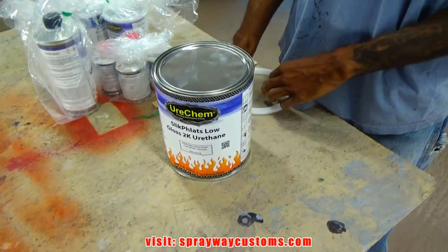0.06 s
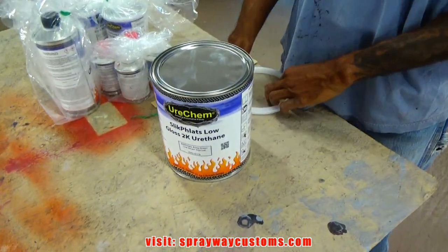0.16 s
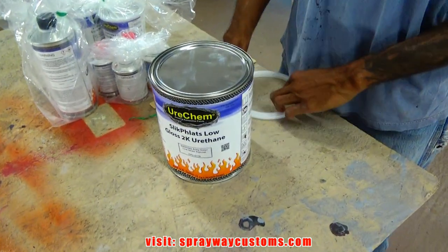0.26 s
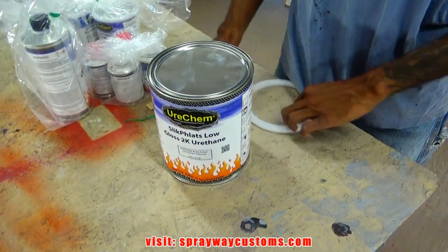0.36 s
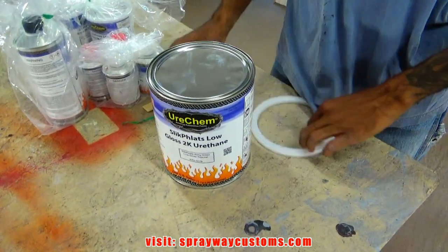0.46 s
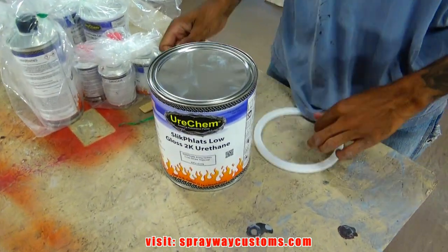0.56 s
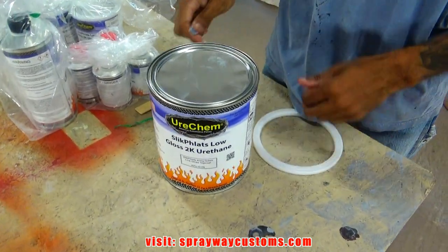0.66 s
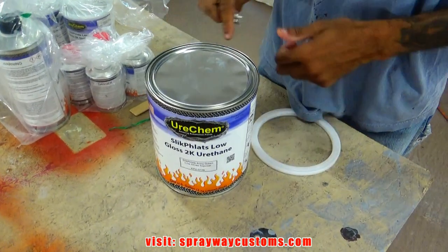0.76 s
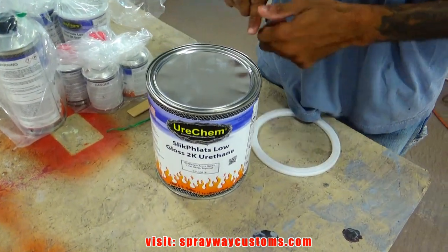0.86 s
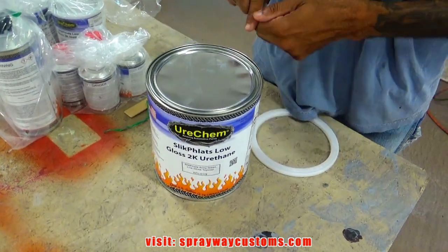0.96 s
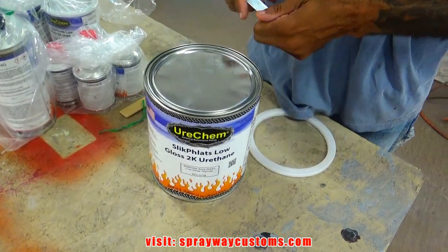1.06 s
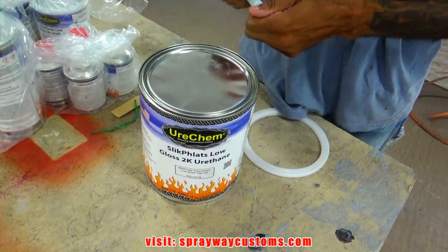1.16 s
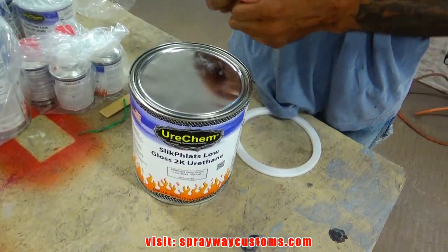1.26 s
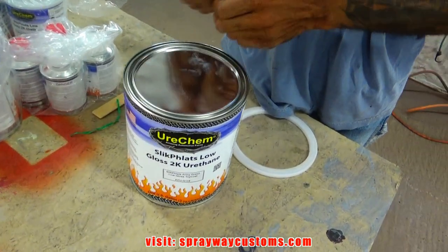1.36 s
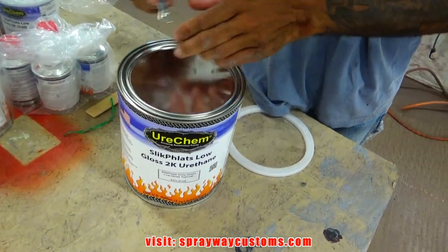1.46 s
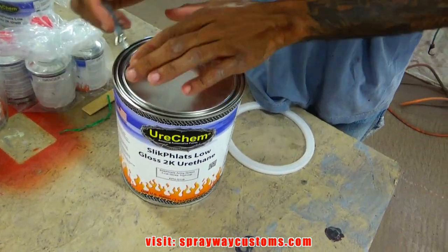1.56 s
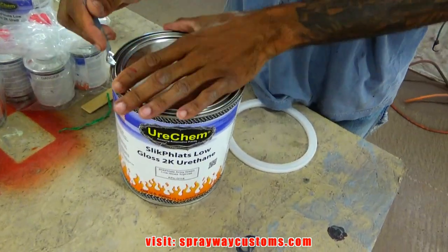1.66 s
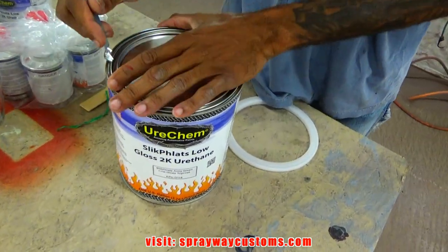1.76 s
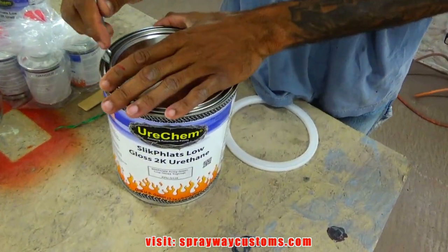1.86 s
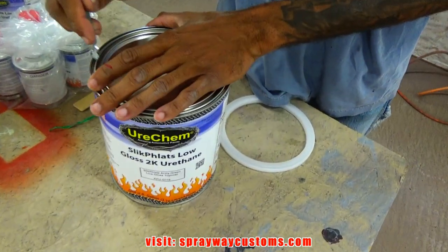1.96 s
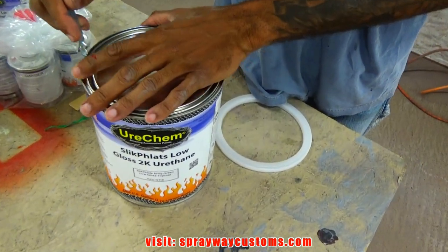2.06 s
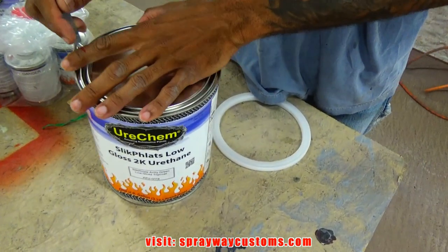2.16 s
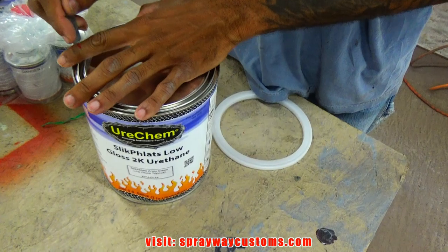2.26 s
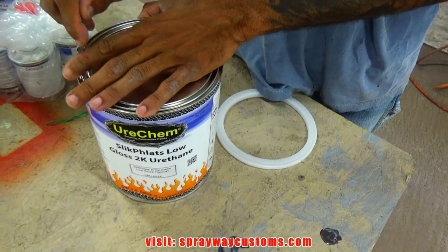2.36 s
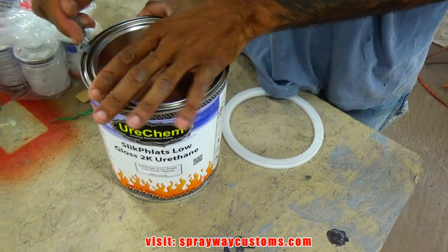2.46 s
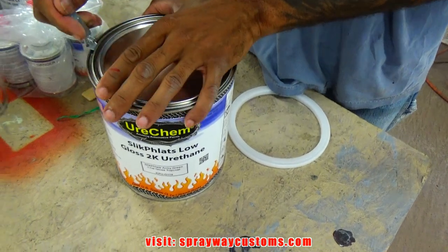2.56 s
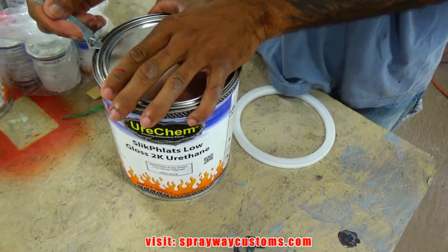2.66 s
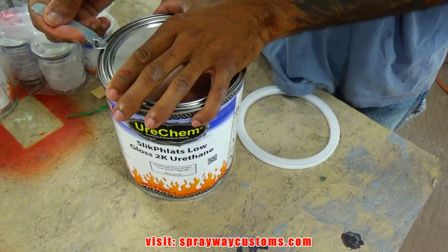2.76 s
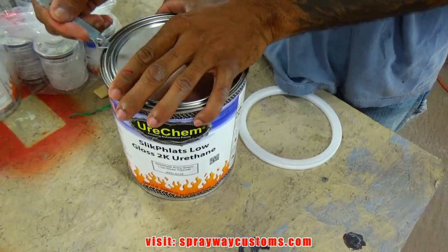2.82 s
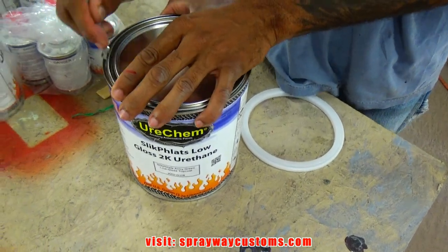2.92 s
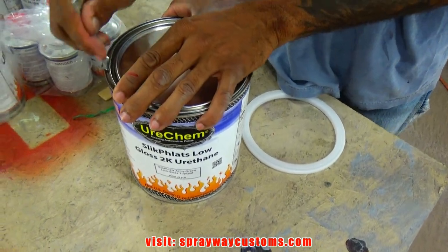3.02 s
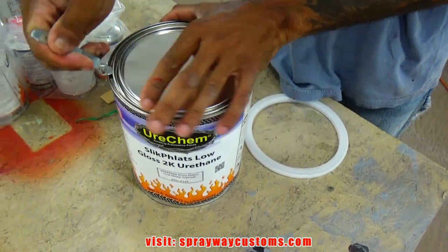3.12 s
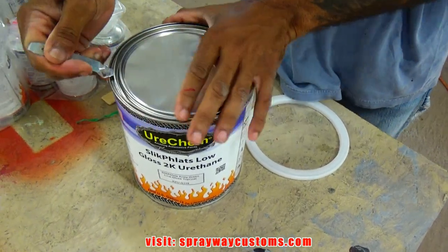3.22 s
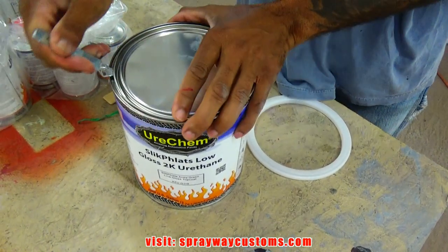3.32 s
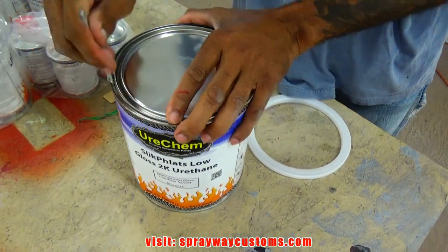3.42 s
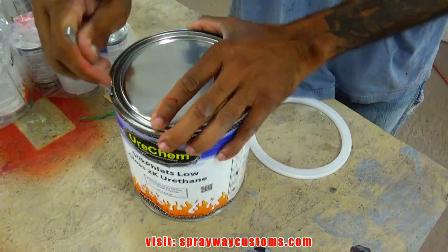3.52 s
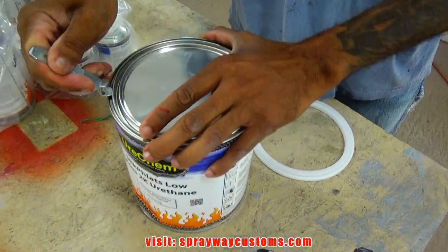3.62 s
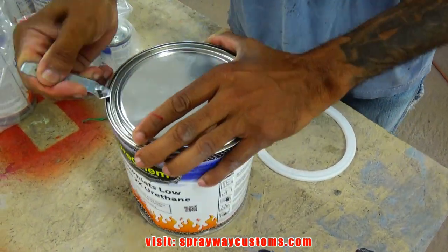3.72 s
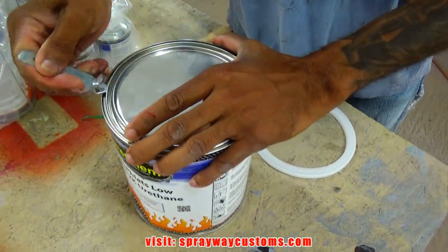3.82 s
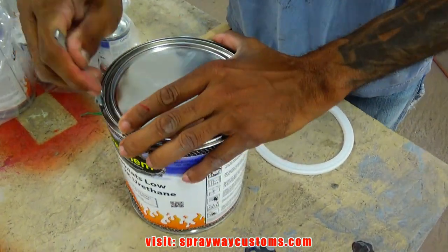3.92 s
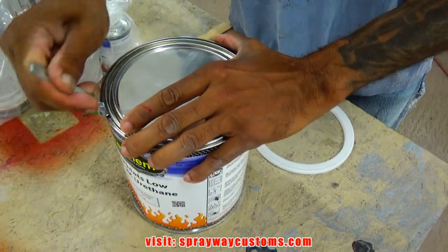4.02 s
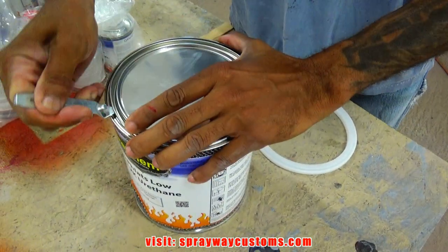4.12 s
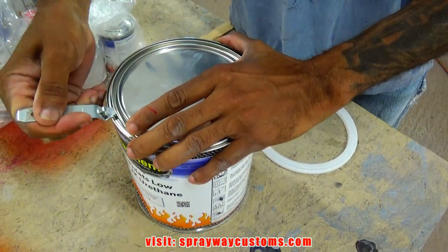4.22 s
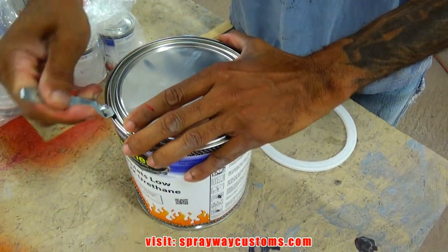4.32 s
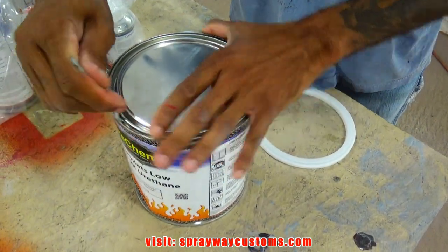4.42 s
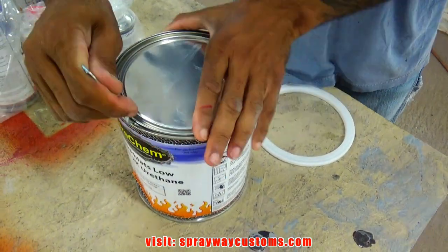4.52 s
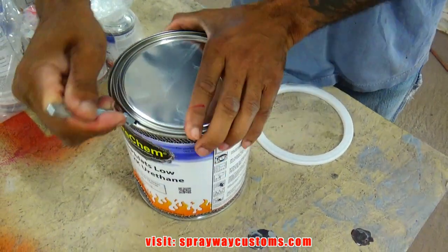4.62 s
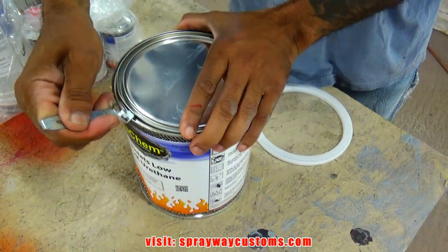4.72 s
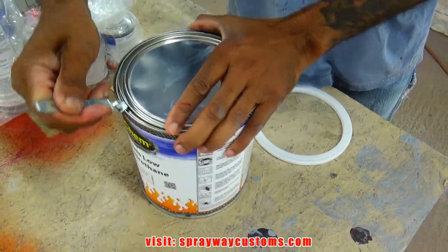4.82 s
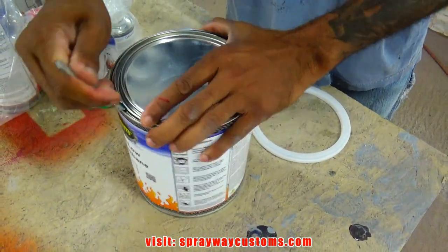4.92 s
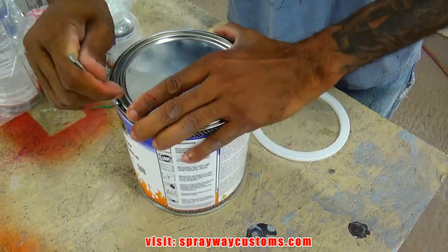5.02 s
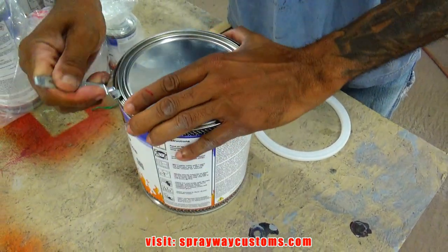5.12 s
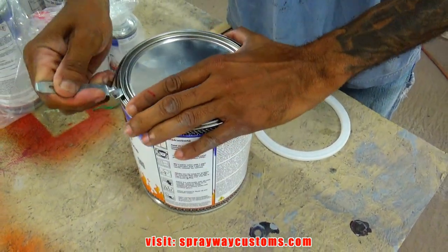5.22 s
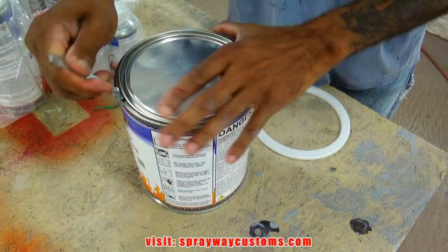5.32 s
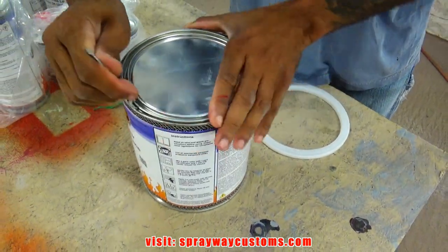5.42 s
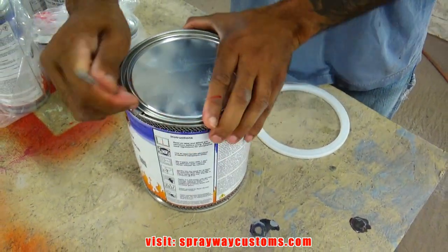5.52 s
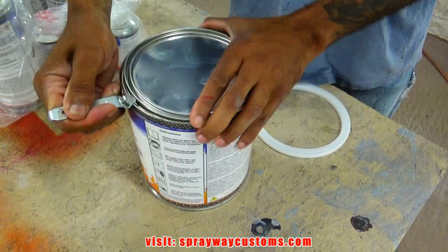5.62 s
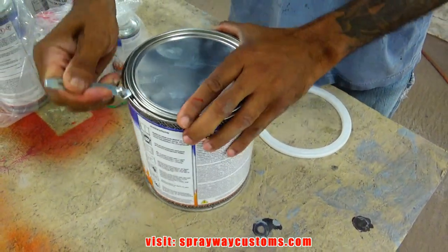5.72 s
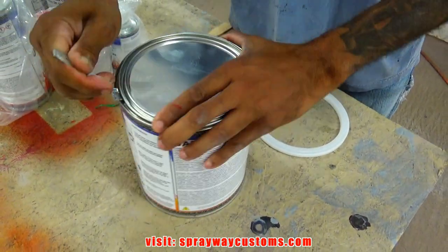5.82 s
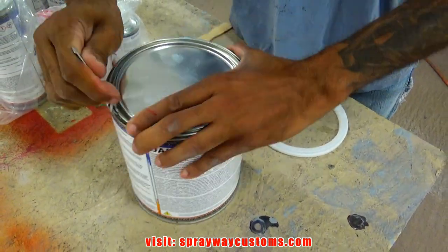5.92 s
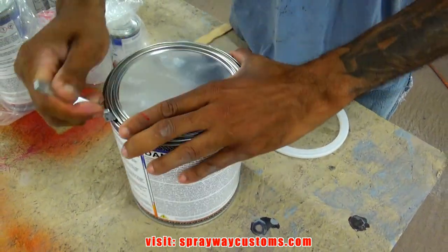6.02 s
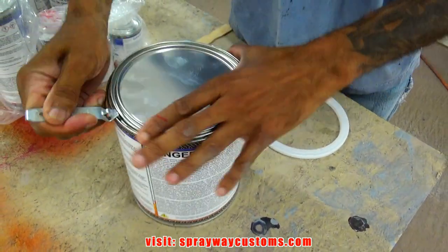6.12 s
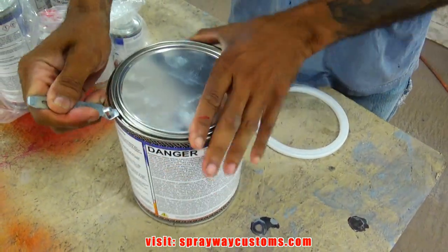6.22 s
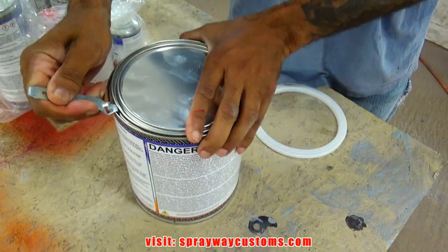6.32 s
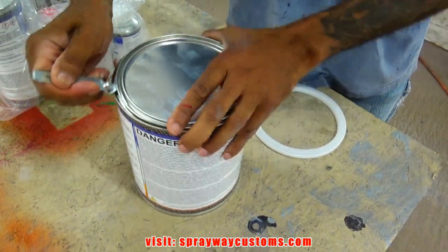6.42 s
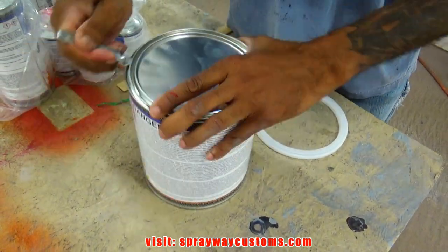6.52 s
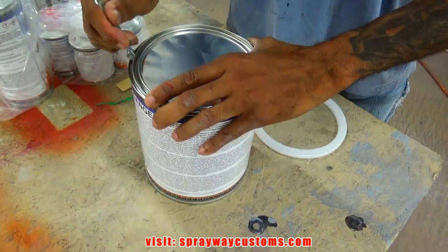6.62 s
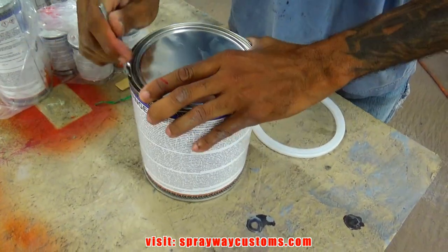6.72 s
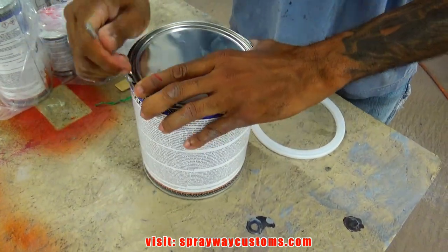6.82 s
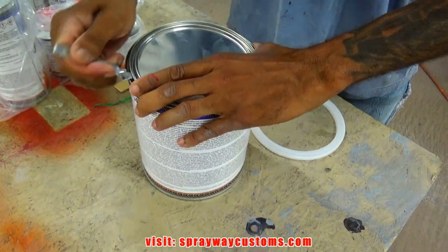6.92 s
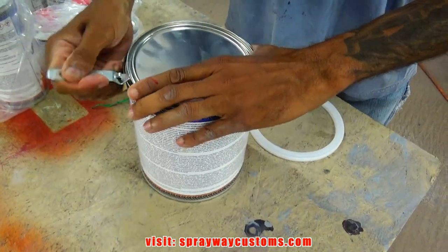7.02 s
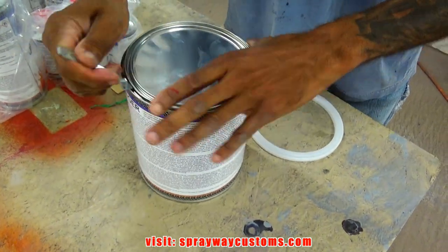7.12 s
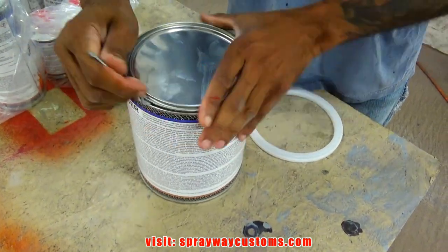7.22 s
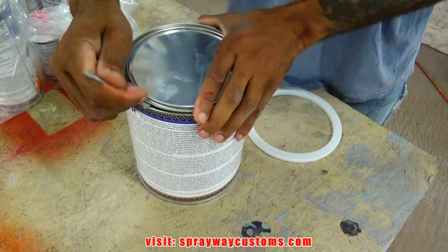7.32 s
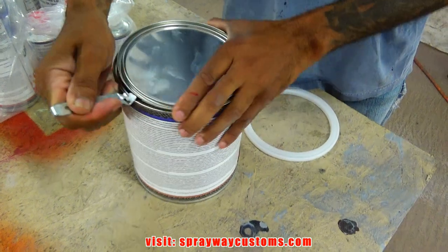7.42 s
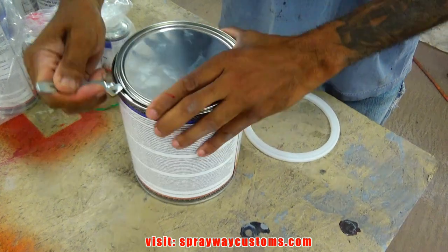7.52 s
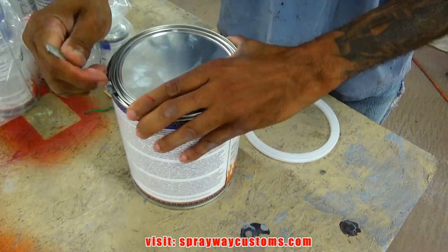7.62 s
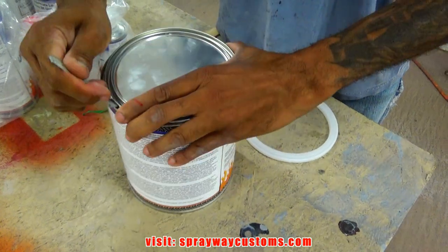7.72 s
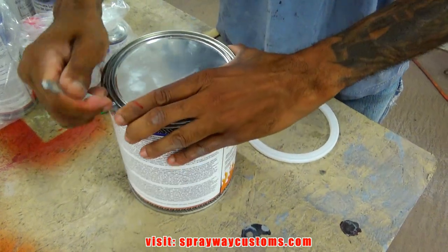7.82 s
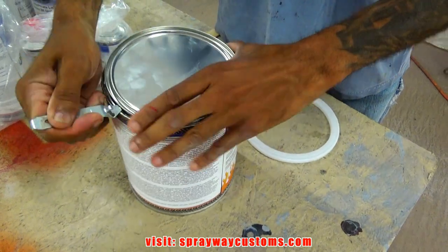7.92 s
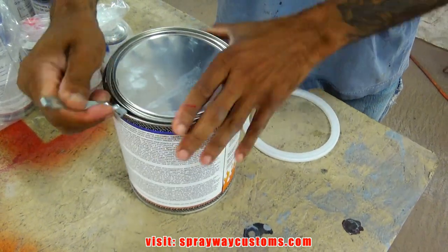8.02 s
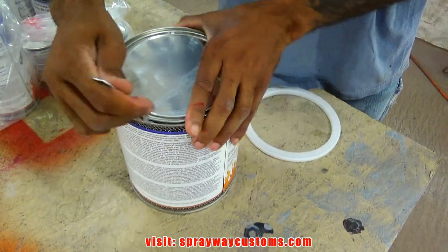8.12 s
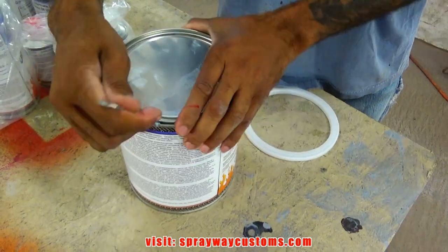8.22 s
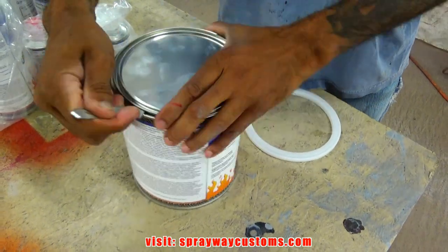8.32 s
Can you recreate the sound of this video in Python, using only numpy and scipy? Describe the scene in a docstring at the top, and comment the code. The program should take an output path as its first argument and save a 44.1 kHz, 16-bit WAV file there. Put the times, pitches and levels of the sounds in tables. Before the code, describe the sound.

A plastic ring judders across a bench, then a steel opener clicks and scrapes around a full paint can's rim as the lid pops dully.

```python
"""In a small workshop with a faint hum, a plastic ring judders over a bench and is let go; cloth brushes, a handle sings.
Then a steel opener works round the lid of a full paint can: it clicks into the rim, the lid gives with dull tin pops,
and blade and can scrape as the can is turned for the next bite; once the blade skids with a shrill hiss.
Struck parts are decaying modes and noise bursts; rubbing is random slips shaped by strokes and spectra.
Two close microphone ports hear it with a quick reflection and the room's answer."""
import sys
import numpy as np
from scipy import signal
from scipy.fft import rfft, irfft, next_fast_len
from scipy.io import wavfile
from scipy.ndimage import uniform_filter1d, map_coordinates

SR = 44100
rng = np.random.default_rng(int(sys.argv[2]) if len(sys.argv) > 2 else 0)


def materialize(psi):
    """Save the field psi as 16-bit PCM at rate SR to the path in sys.argv[1].

    A 1-D psi becomes a single channel; in a 2-D psi each row is a channel.
    """
    bounded = np.clip(np.atleast_2d(psi).T, -1, 1)
    quanta = np.round(bounded * 32767).astype(np.int16)
    wavfile.write(sys.argv[1], SR, quanta)


N = 369116
CLOCK = np.arange(N) / SR  # s
AGE = np.arange(SR // 3) / SR  # s since a strike

# Modes of the can, the lid's lowest eight first, then rim and wall.
# Each row: nominal frequency in Hz, relative level in dB, t60 in seconds.
CAN_MODES = [(486.4, -14.5, 0.15), (544, -9.5, 0.15), (584, -9.5, 0.049), (650.3, -3.5, 0.12),
             (689.6, 2.5, 0.098), (805, -13.5, 0.16), (879, -17, 0.16), (931, -11.5, 0.075),
             (1088, -11.5, 0.24), (1147, -8.5, 0.13), (1234, -2.5, 0.093), (1377, -5, 0.13),
             (1431, -10, 0.15), (1634, -5, 0.062), (1693, -8.5, 0.13), (1810, -5.5, 0.048),
             (2070, -21, 0.16), (2020, -4.5, 0.068), (2122, -8.5, 0.071), (2366, -7, 0.053),
             (2660, -32, 0.046), (2970, -29, 0.064)]
LID_MODE_COUNT = 8


def amp(db):
    """Decibels to gain."""
    return 10 ** (np.asarray(db) / 20)


def unit(x):
    """Scale to rms 1."""
    return x / np.sqrt(np.mean(x ** 2) + 1e-20)


def crest(x, size=176):
    """Scale so that the loudest window of size samples (4 ms by default) has rms 1."""
    return x / np.sqrt(uniform_filter1d(x ** 2, size).max() + 1e-20)


def along(points, hz):
    """(Hz, value) points read on a log frequency axis."""
    point_hz, value = np.transpose(points)
    return np.interp(np.log(hz + 1), np.log(point_hz + 1), value)


def filtered(x, response):
    """x times a response of frequency, zero-padded."""
    n = x.shape[-1]
    padded = next_fast_len(n + 8192)
    hz = np.fft.rfftfreq(padded, 1 / SR)
    return irfft(rfft(x, padded) * response(hz), padded)[..., :n]


def coloured(x, spectrum):
    """x shaped by a spectrum, at rms 1."""
    return unit(filtered(x, lambda hz: amp(along(spectrum, hz))))


def wobble(rate):
    """A smooth random curve, rate knots a second."""
    knots = rng.standard_normal(int(N * rate / SR) + 4)
    return map_coordinates(knots, [CLOCK * rate])


def add(track, s, sound):
    """Mix a sound into a track at time s."""
    room = track[max(round(s * SR), 0):][:len(sound)]
    room += sound[:len(room)]


def decaying_noise(t60):
    """White noise that dies away by 60 dB in t60 seconds."""
    return rng.standard_normal(len(AGE)) * amp(-60 * AGE / t60)


def burst(spectrum, t60, attack):
    """Many crowded modes struck together: coloured noise that dies away."""
    noise = coloured(rng.standard_normal(len(AGE)), spectrum)
    return crest(noise * amp(-60 * AGE / t60) * (1 - np.exp(-AGE / attack)))


def ring(modes, scatter_db):
    """Metal modes start from rest; each contact weights and tunes them a little differently."""
    hz, db, t60 = np.transpose(modes)[:, :, None]
    strength, tuning, direction = rng.standard_normal((3, len(modes), 1))
    waves = np.sign(direction) * np.sin(2 * np.pi * hz * (1 + 0.0083 * tuning) * AGE)
    fade = amp(db + scatter_db * strength - 60 * AGE / t60)
    return crest((waves * fade).sum(0) * (1 - np.exp(-AGE / 0.00077)))


def stroke(s, rise, fall, db):
    """Gain of one stroke: it bites, swells to its peak, eases off and lets go."""
    bite_s, swell_db, ease_db, release_db_per_s = 0.002, 9, 9.5, 550
    t = CLOCK - s
    pressure_db = np.interp(t, [0, rise, rise + fall], [-swell_db, 0, -ease_db])
    release_db = release_db_per_s * np.maximum(t - rise - fall, 0)
    return np.clip(t / bite_s, 0, 1) * amp(db + np.maximum(pressure_db - release_db, -120))


def strokes(rows):
    """Gain of a run of strokes, then of each layer given relative to it; overlaps add in power."""
    gains = np.array([stroke(*row[:4]) for row in rows])
    layers = amp(np.array([(0, *row[4:]) for row in rows]))
    return np.sqrt(layers.T ** 2 @ gains ** 2)


def friction(rate, spread_db, smooth):
    """Tiny slips of uneven size at random moments (rate a second), over a smooth rub."""
    chance, size, rub = rng.random(N), rng.standard_normal(N), rng.standard_normal(N)
    slips = (chance < rate / SR) * np.sign(rub) * amp(spread_db * np.clip(size, -2, 2))
    return unit(unit(slips) + smooth * rng.standard_normal(N))


def wandering(x, depth_db):
    """Resonances come and go as the contact point moves."""
    z = signal.stft(x, nperseg=512)[2]
    across_hz = uniform_filter1d(rng.standard_normal(z.shape), size=5, axis=0)
    field = uniform_filter1d(across_hz, size=14, axis=1)
    return signal.istft(z * amp(depth_db * unit(field)), nperseg=512)[1][:N]


def background():
    """Still air as coloured noise, and the wavering hum of a distant machine as phase-wobbled sines."""
    # Each row: frequency in Hz, relative density in dB.
    air_spectrum = [(15, -41.5), (25, -20), (39, -10), (50, -11.5), (64, -33), (90, -15), (145, -11),
                    (212, -14.5), (242, -14), (451, -15.5), (489, -12), (911, -13.5), (1610, -16.5),
                    (4140, -22.5), (5730, -22.5), (16000, -31)]
    # Each row: frequency in Hz, peak level in dB.
    hum_tones = [(96, -62), (156.1, -65.5), (188.4, -63.5)]
    mid, side = (coloured(rng.standard_normal(N), air_spectrum) for _ in range(2))
    hum = sum(amp(db) * np.sin(2 * np.pi * hz * CLOCK + 1.07 * wobble(23)) for hz, db in hum_tones)
    return amp(-54.5) * (mid + 0.33 * np.array([side, -side])) + hum


def plastic_ring():
    """The ring judders over the rough bench top: each slip drums the board and snaps in the plastic."""
    # Ring sliding. Each row: start in seconds, rise in seconds, fall in seconds, bench level in dB,
    # rub re bench in dB, squeak re bench in dB, all levels before trim.
    drags = [(0, 0.0013, 0.085, -24.5, 4.5, -5.5), (.26, 0.045, 0.035, -35.5, -0.5, -23),
             (.35, 0.031, 0.15, -24.5, -5.5, -10), (.43, 0.14, 0.068, -25, -10, -1),
             (.64, .01, 0.066, -29, -10, -8)]
    # Ring knocking. Each row: start in seconds, knock level in dB, snap re knock in dB, before trim.
    knocks = [(0.0506, -14, 0.5), (0.08, -23, -16), (0.197, -29.5, -36), (0.249, -19, -7.5),
              (0.303, -29.5, 5), (0.343, -14.5, -4), (0.445, -31, 11), (0.493, -28.5, 7.5),
              (0.52, -34.5, 12.5), (0.548, -34, 2), (0.552, -22, 8.5), (0.593, -22, 1.5), (0.609, -26, 10),
              (0.646, -20.5, -18), (0.685, -27.5, -4)]
    # Spectra of board, rubbed ring and snapping plastic. Each row: frequency in Hz, relative density in dB.
    board_spectrum = [(30, -60), (90, -24), (170, -16), (280, -4.5), (400, -3.5), (530, 2.5), (700, 3.5),
                      (900, -1), (1200, -11), (2400, -18), (5000, -45)]
    rub_spectrum = [(700, -22), (1300, -5.5), (1700, -7.5), (2200, -9), (3100, -10.5), (5200, -12.5),
                    (7000, -18.5), (8500, -17), (11000, -34), (15500, -69)]
    plastic_spectrum = [(1200, -22), (2200, -13), (3200, -14), (3600, 3.5), (4300, -2), (5200, -15),
                        (5650, -10), (6800, -17), (8600, -12), (11000, -24), (15500, -42)]
    bench_gain, rub_gain, squeak_gain = strokes(drags)
    judder = friction(rate=210, spread_db=3.5, smooth=0.35)

    def answer(spectrum, t60):
        """Each slip excites a decaying noise response."""
        return coloured(signal.fftconvolve(judder, decaying_noise(t60))[:N], spectrum)

    out = amp(1.0) * bench_gain * answer(board_spectrum, t60=0.098)
    out += amp(0.5) * rub_gain * answer(rub_spectrum, t60=0.11)
    out += amp(1.5) * squeak_gain * answer(plastic_spectrum, t60=0.0072)
    for s, db, snap_db in knocks:
        sharp = burst(plastic_spectrum, t60=0.018, attack=0.000079)
        dull = burst(rub_spectrum, t60=0.0057, attack=0.00016)
        knock = burst(board_spectrum, t60=0.12, attack=0.00023)
        add(out, s, amp(db - 2.0) * knock + amp(db + snap_db - 0.5) * crest(sharp + dull))
    return out


def shirt():
    """Shirt and arm brush softly past as the hands move: dense, fine friction."""
    # Each row: start in seconds, rise in seconds, fall in seconds, peak level in dB.
    brushes = [(.75, 0.1, 0.2, -45), (1.0, 0.022, .5, -58.5), (1.54, 0.03, 0.44, -55.5)]
    # Each row: frequency in Hz, relative density in dB.
    cloth_spectrum = [(290, -46), (500, -18), (714, -14), (935, -14.5), (2760, -9), (3140, -4),
                      (4110, -9.5), (6760, -7.5), (11800, -22), (15000, -30)]
    return strokes(brushes)[0] * coloured(friction(rate=2000, spread_db=1.5, smooth=1), cloth_spectrum)


def handle():
    """The opener's free handle goes on singing: a faint, slightly unsteady, slowly dying sine."""
    # Each row: start in seconds, initial peak level in dB.
    handle_rings = [(.77, -53), (2.2122, -51)]
    note_hz, t60_s, attack_s = 3230, 1.4, 0.004
    out = np.zeros(N)
    for s, db in handle_rings:
        note = np.sin(2 * np.pi * note_hz * CLOCK + 1.0 * wobble(58))
        add(out, s, note * amp(db - 60 * CLOCK / t60_s) * (1 - np.exp(-CLOCK / attack_s)))
    return out


def blow(boom_db, clang_db, tick_db, thud_db, edge_hz):
    """The blade ticks on the rim, the lid booms, the wall clangs below edge_hz and the can knocks the bench."""
    # The steel opener. Each row: nominal frequency in Hz, relative level in dB, t60 in seconds.
    blade_modes = [(3660, -4, 0.018), (4900, 12, 0.026), (6020, -3, 0.11), (8410, 32, 0.037),
                   (8500, -7, 0.049), (8530, 13, 0.04)]
    # Spectra of wall, blade contact and bench knock. Each row: frequency in Hz, relative density in dB.
    clang_spectrum = [(600, -25.5), (1100, -1.5), (1800, -1), (2800, -6.5), (3500, -11), (6000, -25),
                      (12000, -53)]
    tick_spectrum = [(1200, -49), (2800, -10), (4200, -7), (6300, -4.5), (8000, -2), (10000, -4),
                     (13000, -14.5), (16000, -30)]
    thud_spectrum = [(40, -40), (110, -3), (190, 0.5), (310, 8.5), (480, 2), (900, -20), (2000, -60)]
    boom = ring(CAN_MODES[:LID_MODE_COUNT], scatter_db=3.8)
    wall = ring(CAN_MODES[LID_MODE_COUNT:], scatter_db=2.5)
    crowd = burst(clang_spectrum, t60=0.078, attack=0.000062)
    lowpass = signal.butter(2, edge_hz, fs=SR, output="sos")
    clang = crest(signal.sosfilt(lowpass, 0.75 * wall + crowd))
    blade = amp(-13) * ring(blade_modes, scatter_db=2)
    sizzle = amp(-18) * burst(tick_spectrum, t60=0.1, attack=0.001)
    tick = burst(tick_spectrum, t60=0.017, attack=0.00081) + sizzle + blade
    thud = burst(thud_spectrum, t60=0.08, attack=0.00066)
    # level trims
    out = amp(boom_db - 0.56) * boom + amp(clang_db - 4.0) * clang
    return out + amp(tick_db - 1.15) * tick + amp(thud_db - 2.0) * thud


def pries():
    """Clicks, pops and bumps strike the same can, each in its own proportions."""
    # All levels are before the trims in blow().
    # Blade catches on the rim. Each row: start in seconds, wall clang in dB, blade tick re clang in dB.
    clicks = [(1.799, -16, -9), (1.936, -24.5, -1), (1.974, -40.5, 1), (2.2135, -13.5, -3.5),
              (2.222, -27, 13.5), (2.335, -17.5, -18), (2.521, -41, -12), (2.581, -37.5, -7),
              (2.595, -29.5, -12.5), (2.8445, -49.5, 22.5), (3.0045, -15.5, 1.5), (3.174, -35.5, 1),
              (3.221, -44.5, 1), (3.522, -25.5, 3.5), (3.533, -19.5, -14.5), (3.986, -27.5, 5),
              (4.128, -36.5, 1.5), (4.264, -49, -3), (4.463, -32.5, 4.5), (4.573, -32, -9),
              (4.729, -36.5, -3), (4.745, -22.5, -10), (4.998, -21, -4), (5.006, -33.5, 21),
              (5.182, -33.5, -10), (5.212, -25.5, -8.5), (5.453, -31.5, 3), (5.675, -24.5, -9),
              (6.136, -30, -3.5), (6.16, -36, -7), (6.286, -50, 14.5), (6.484, -44.5, 11.5),
              (7.192, -32.5, 4.5), (7.7191, -22.5, 6), (8.171, -44, 21.5)]
    # Lid gives under the lever. Each row: start in seconds, boom in dB, wall clang re boom in dB,
    # blade tick re boom in dB.
    pops = [(2.8445, -33.5, -28, -24), (3.831, -13.5, -3.5, -22), (4.365, -46.5, -30, -27),
            (4.772, -15.5, -10.5, -27), (4.896, -6, 0.5, -22), (4.917, -11.5, 0.5, -44),
            (5.086, -27, -3, -20), (5.238, -19.5, -20, -26), (5.6973, -7, 0, -12), (5.713, -25, -4, -30),
            (7.722, -24, -15, -16), (8.103, -33.5, -32, -26)]
    # Can rocks down on the bench. Each row: start in seconds, thud in dB, lid boom re thud in dB.
    bumps = [(3.743, -35.5, 1.5), (6.18, -35, 6.5), (6.374, -29, 3.5), (7.049, -19.5, -5), (7.074, -31, 3),
             (7.978, -33.5, 0.5), (7.994, -35.5, 5), (8.331, -27, -7)]
    soft_hz, hard_hz = 2700, 6000  # top of the wall's clang under a soft and a hard contact
    # a click's weight lies between its clang and its tick; lid and bench answer that weight
    tick_share, click_boom_db, click_thud_db = 0.4, -4.5, -15.5
    pop_thud_db = -29  # re boom
    bump_clang_db, bump_tick_db = -5.5, -9.5  # re thud
    out = np.zeros(N)
    for s, db, tick_db in clicks:
        weight_db = db + tick_share * tick_db
        add(out, s, blow(weight_db + click_boom_db, db, db + tick_db, weight_db + click_thud_db, hard_hz))
    for s, db, clang_db, tick_db in pops:
        add(out, s, blow(db, db + clang_db, db + tick_db, db + pop_thud_db, soft_hz))
    for s, db, boom_db in bumps:
        add(out, s, blow(db + boom_db, db + bump_clang_db, db + bump_tick_db, db, soft_hz))
    return out


def scrapes():
    """Steel rasps along the rim and sets the tin ringing; the turned can's base grinds on the bench."""
    # Blade along the rim. Each row: start in seconds, rise in seconds, fall in seconds, rasp level in dB,
    # tin body re rasp in dB, levels before trim.
    rim_scrapes = [(1.892, 0.02, .03, -35.5, 5.5), (2.028, 0.019, 0.0072, -41, -4.5),
                   (3.03, 0.011, 0.14, -43, 2), (3.262, .025, 0.094, -49, -17),
                   (3.53, 0.053, 0.19, -40, 1.5), (3.988, 0.041, 0.07, -34.5, 2),
                   (4.47, 0.055, 0.032, -39, 7.5), (4.55, 0.027, 0.028, -36, 0),
                   (4.79, 0.26, 0.13, -47.5, -24), (5.012, .035, 0.051, -30.5, 1),
                   (5.36, 0.07, 0.028, -49, -2), (5.454, 0.053, 0.047, -34.5, 1.5),
                   (5.56, 0.034, 0.041, -45.5, 2.5), (5.78, 0.016, 0.25, -47.5, -2),
                   (5.915, 0.066, 0.082, -32.5, 1), (6.14, 0.021, 0.021, -45, 7),
                   (6.27, .02, 0.038, -40, -4), (6.405, 0.04, 0.013, -40, 0), (6.48, 0.053, 0.29, -41, 3),
                   (6.745, .015, 0.042, -34.5, 2), (6.805, 0.072, 0.037, -25.5, -6.5),
                   (6.89, .01, 0.065, -49, 16.5), (7.19, 0.029, 0.089, -35, 0),
                   (7.265, 0.087, .03, -27, -2.5), (7.485, 0.056, 0.27, -43, 0.5),
                   (7.73, 0.031, 0.12, -32.5, 4), (7.865, 0.035, 0.014, -33.5, 3),
                   (8.02, 0.14, 0.036, -48.5, 0), (8.17, 0.078, 0.073, -27.5, 0)]
    # Can turned on its base. Each row: start in seconds, rise in seconds, fall in seconds, level in dB before trim.
    turns = [(3.52, 0.017, 0.036, -33.5), (3.58, 0.071, 0.065, -38), (3.74, 0.036, 0.015, -39.5),
             (3.99, 0.028, 0.019, -33.5), (4.48, 0.036, 0.035, -38.5), (4.57, 0.024, 0.014, -36),
             (4.73, 0.037, 0.062, -43.5), (5.0, 0.017, 0.077, -37), (5.5, 0.026, 0.015, -39),
             (5.75, .025, 0.045, -40), (5.9, 0.057, 0.15, -36.5), (6.12, 0.35, 0.049, -50),
             (6.48, 0.13, 0.1, -35), (6.9, 0.018, 0.05, -38.5), (7.19, 0.013, .03, -42),
             (7.48, 0.3, 0.11, -44.5), (8.08, 0.056, 0.21, -54)]
    # Spectra of blade, rubbed tin and base. Each row: frequency in Hz, relative density in dB.
    rasp_spectrum = [(1500, -34), (2800, -5), (4500, -1.5), (6200, -5), (8000, 1.5), (10300, -2.5),
                     (12500, -10.5), (15500, -25)]
    tin_spectrum = [(250, -18), (520, -9.5), (610, 3.5), (690, -1), (790, -2), (980, -9.5), (1150, -8),
                    (1290, 2.5), (1480, -6), (1850, -1.5), (2800, -9.5), (4200, -32.5), (8000, -50)]
    grind_spectrum = [(40, -43), (100, -22), (160, 3.5), (270, 1.5), (380, 0), (520, 3.5), (900, -2.5),
                      (2000, -24)]
    rasp_gain, tin_gain = strokes(rim_scrapes)
    bench_gain, = strokes(turns)
    unevenness = amp(2.23 * wobble(150) + 0.7 * wobble(40))
    grit = friction(rate=3000, spread_db=-0.5, smooth=1.0) * unevenness
    rasp = coloured(wandering(grit, depth_db=3.5), rasp_spectrum)
    rung = signal.fftconvolve(grit, ring(CAN_MODES, scatter_db=3))[:N]
    singing = unit(wandering(rung, depth_db=3))
    rubbed = coloured(wandering(grit, depth_db=2.0), tin_spectrum)
    tin = amp(-2.5) * rubbed + amp(-5.5) * singing
    grind = coloured(friction(rate=360, spread_db=1.5, smooth=0.45), grind_spectrum)
    return amp(1.5) * rasp_gain * rasp + tin_gain * tin + amp(0.7) * bench_gain * grind


def skid():
    """The blade skids out of the groove under load with a short, shrill hiss of dense slips."""
    # Each row: start in seconds, rise in seconds, fall in seconds, peak level in dB.
    skids = [(5.741, 0.014, 0.0099, -14.5)]
    # Each row: frequency in Hz, relative density in dB.
    hiss_spectrum = [(880, -36), (1500, -16), (1780, -12), (3810, -16.5), (4120, -8), (4500, -13),
                     (4870, -7.5), (6760, -3), (12100, -14.5), (16000, -39)]
    return strokes(skids)[0] * coloured(friction(rate=4000, spread_db=3, smooth=0.8), hiss_spectrum)


def clutter(x):
    """Jars and bench top close by scatter a quick reflection, opposite in sign at the two ports."""
    scatter = decaying_noise(t60=0.008)
    side = signal.fftconvolve(x, scatter / np.linalg.norm(scatter))[:N]
    return np.array([side, -side])


def workshop(x):
    """The room's answer at each port; each frequency dies at its own speed."""
    # Each row: frequency in Hz, t60 in seconds.
    room_t60 = [(150, 0.42), (700, 0.3), (3000, 0.47), (8000, 0.47), (15000, 0.044)]
    hz, t, z = signal.stft(rng.standard_normal((2, SR // 2)), SR, nperseg=256)
    decay = amp(-60 * t / along(room_t60, hz)[:, None])
    onset = 1 - np.exp(-t / 0.0016)
    tail = signal.istft(z * decay * onset, SR, nperseg=256)[1]
    first, second = signal.fftconvolve(x[None], tail / np.linalg.norm(tail[0]), axes=1)[:, :N]
    return np.array([first + 0.42 * second, first - 0.15 * second])


def scene():
    """Everything happens on the bench, straight ahead; the deepest bass is cut away."""
    low_cut_hz = 74
    work = plastic_ring() + shirt() + handle() + pries() + scrapes() + skid()
    work = signal.sosfilt(signal.butter(2, low_cut_hz, "highpass", fs=SR, output="sos"), work)
    return work + amp(-25.5) * clutter(work) + amp(-16.0) * workshop(work) + background()


def record(dry):
    """Two close ports differ a little in phase and level; they clip at full scale, then a band limit cuts."""
    # Each row: frequency in Hz, left minus right in dB.
    port_balance = [(250, 0.1), (500, -0.5), (1000, 0.4), (4000, 0.2), (8000, -0.1)]
    # Each row: frequency in Hz, lead of left over right in radians.
    port_phase = [(100, 0.05), (250, 0.13), (520, 0.37), (1100, 0.68), (2000, 0.52), (4500, 0.34),
                  (12000, 0.059)]
    top_hz = 15900
    sides = np.array([[0.5], [-0.5]])

    def port_response(hz):
        """Half of each difference goes to either side."""
        return amp(sides * along(port_balance, hz)) * np.exp(1j * sides * along(port_phase, hz))

    ports = filtered(dry, port_response)
    return filtered(np.clip(ports, -1, 1), lambda hz: hz < top_hz)


dry = scene()
out = record(dry)
materialize(out)
```